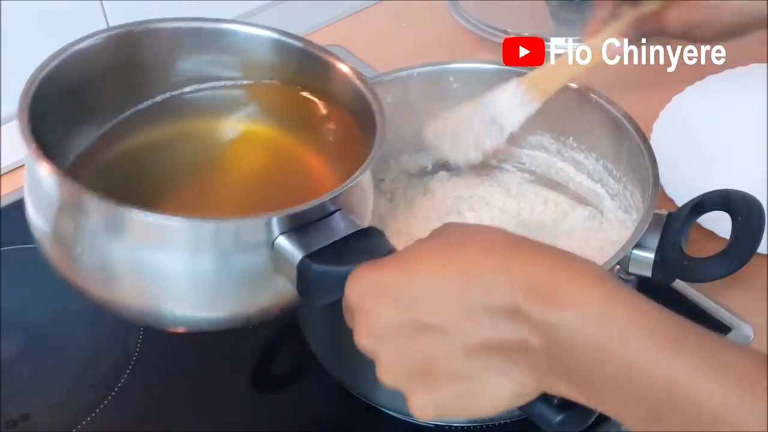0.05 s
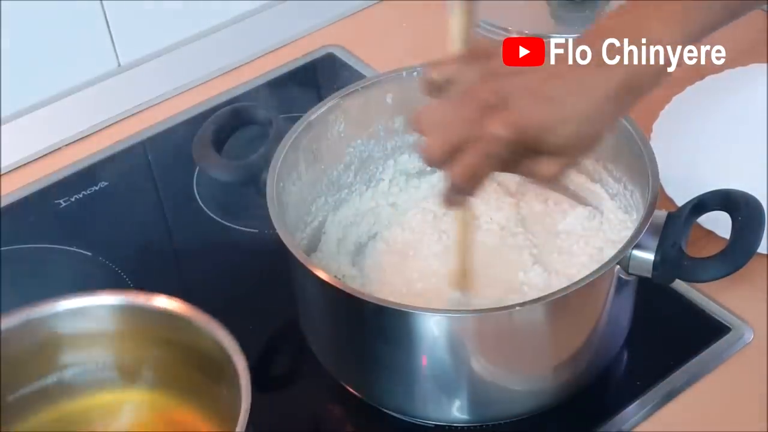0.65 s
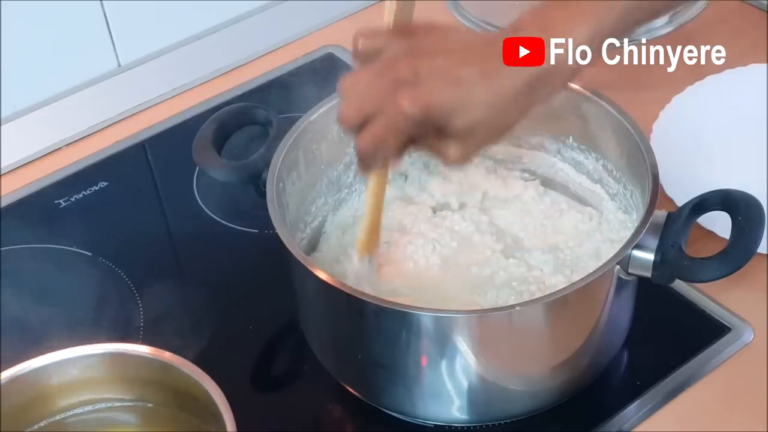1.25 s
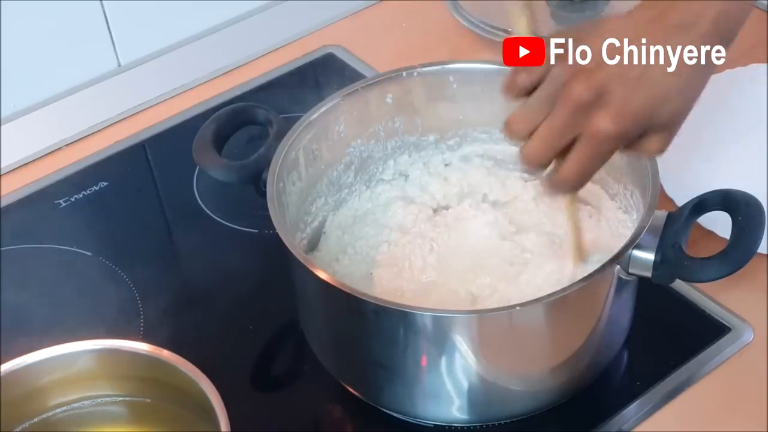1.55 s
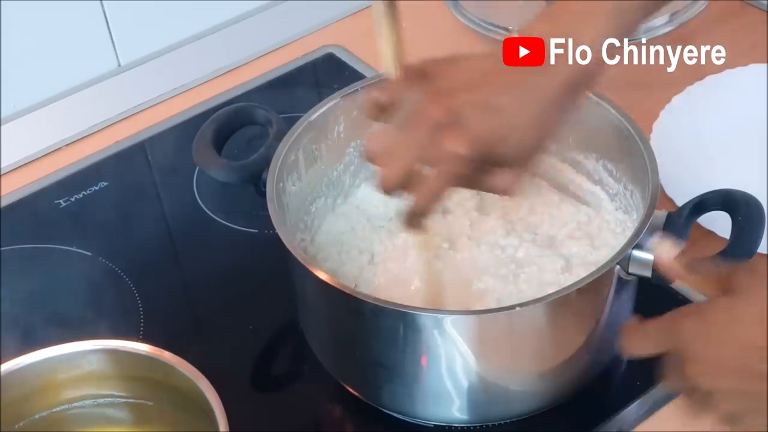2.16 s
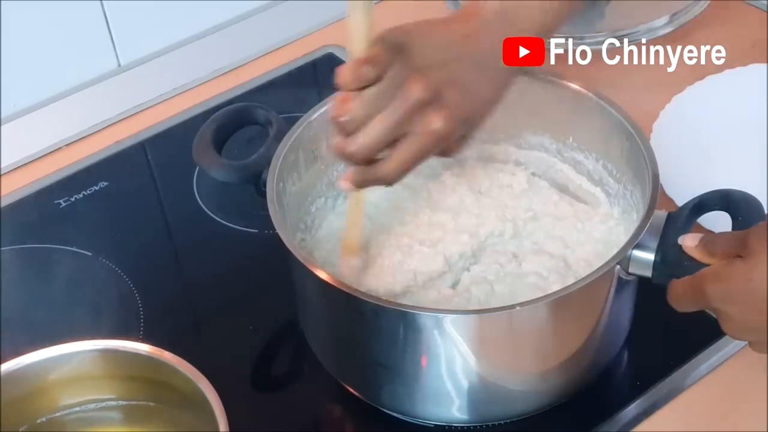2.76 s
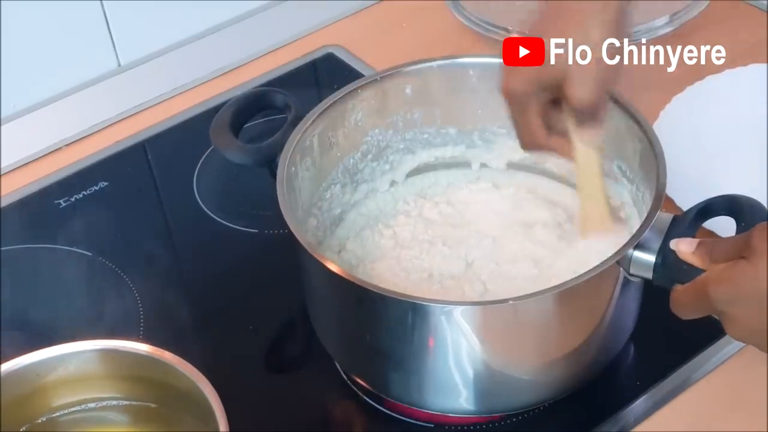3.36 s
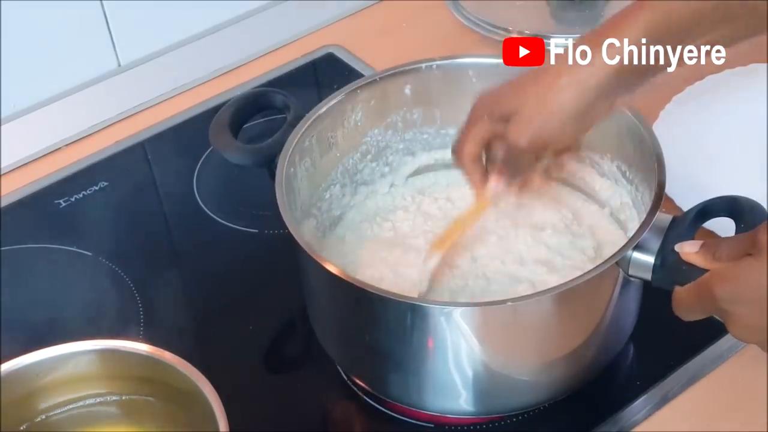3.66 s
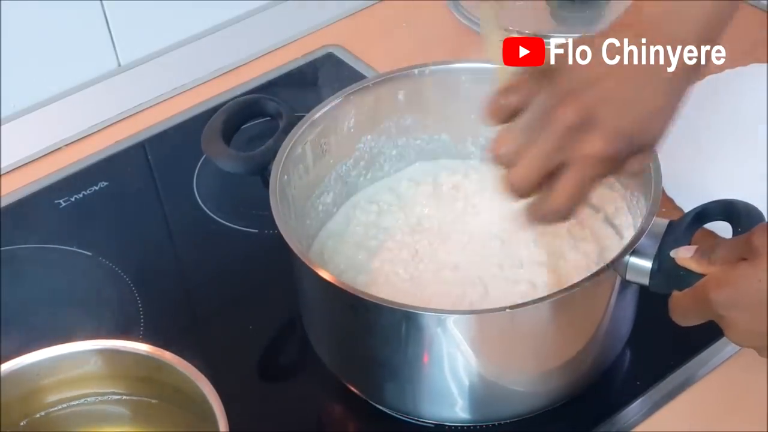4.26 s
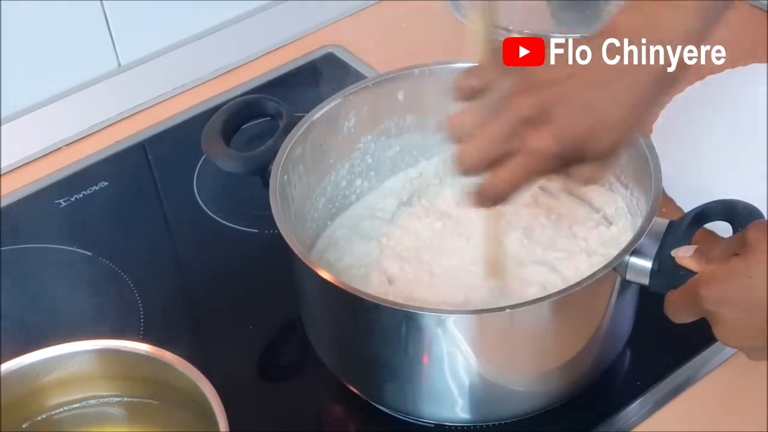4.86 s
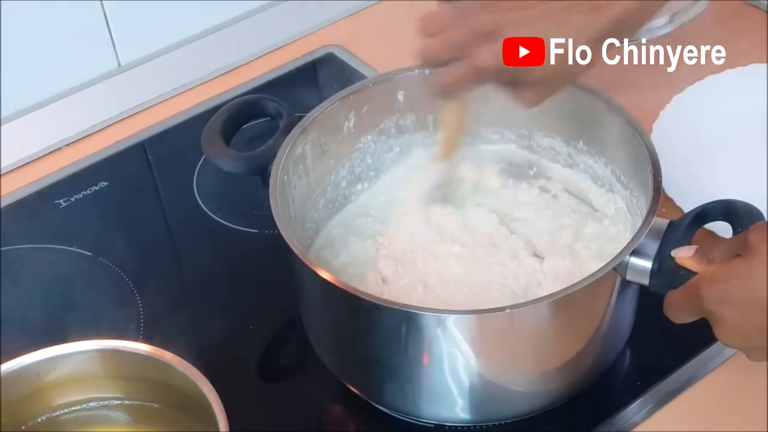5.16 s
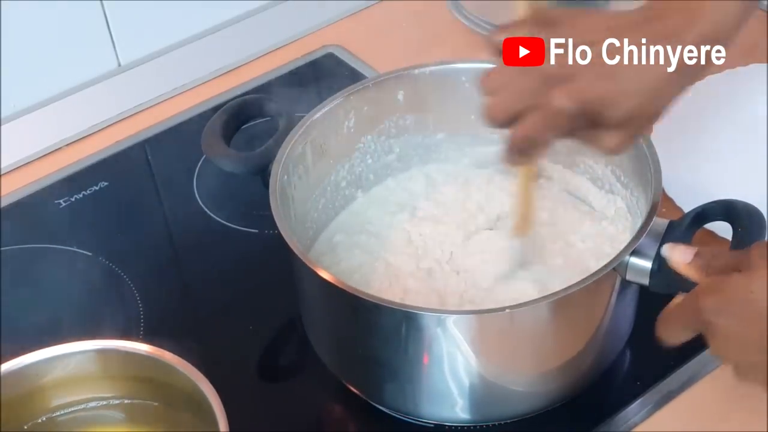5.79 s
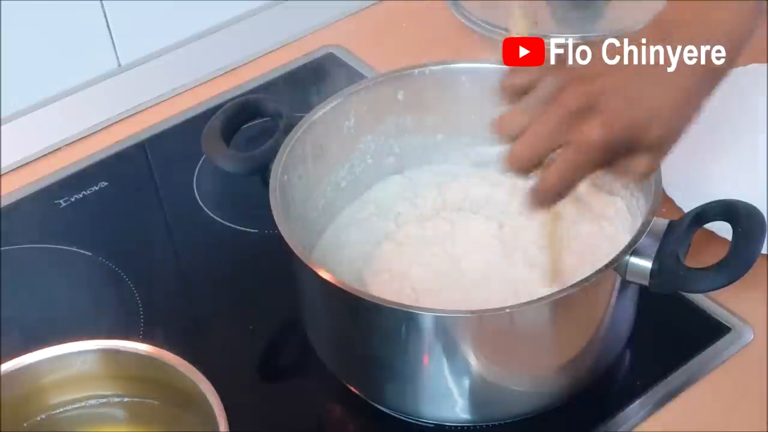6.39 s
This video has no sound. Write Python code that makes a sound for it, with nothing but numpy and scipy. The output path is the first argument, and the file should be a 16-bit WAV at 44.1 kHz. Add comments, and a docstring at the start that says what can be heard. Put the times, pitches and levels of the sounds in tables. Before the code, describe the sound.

A wooden spatula drags through thick paste in a steel pot, with soft squelches, hissing wipes along the wall and light knocks. Just over a second in, a saucepan is set down on the glass hob with one loud, briefly ringing clank. The stirring carries on in uneven strokes, with sharper ticks and short rasps near the end. The stereo microphone is just above the pot in a small tiled kitchen.

```python
"""Stirring paste in a steel pot

A small tiled kitchen, a stereo microphone pair just above a steel pot on a glass hob. A wooden spatula
drags through thick paste in little slips; the paste squelches behind it and hisses along the wall,
and wood bumps, rasps and ticks on steel. Early on, a saucepan is set down beside the pot
with one loud clank, and the room answers."""
import sys
import numpy as np
from scipy import signal
from scipy.fft import rfft, irfft
from scipy.io import wavfile

SR = 44100
rng = np.random.default_rng(int(sys.argv[2]) if len(sys.argv) > 2 else 0)


def generate_wav(sig):
    """Save sig (samples, or channels by samples) to the path in sys.argv[1] as 16-bit PCM at SR."""
    pcm = np.round(np.clip(np.atleast_2d(sig).T, -1, 1) * 32767).astype(np.int16)
    wavfile.write(sys.argv[1], SR, pcm)


N = 283563
HOP = 64  # samples per step of the coarse clock that the gestures run on


def amp(db):
    """Decibels to gain."""
    return 10 ** (np.asarray(db) / 20)


def unit(x):
    """Scales to rms 1."""
    return x / np.sqrt(np.mean(x ** 2) + 1e-20)


def read(points, hz):
    """A table read on a log-frequency axis."""
    f, value = np.transpose(points)
    return np.interp(np.log(hz + 1), np.log(f + 1), value)


def add(mix, s, sound):
    """Mixes a stereo sound in at s seconds."""
    part = mix[:, max(round(s * SR), 0):][:, :sound.shape[1]]
    part += sound[:, :part.shape[1]]


def colour(x, spectrum, size=4096):
    """Minimum-phase filter of unit energy, shaped like the given spectrum."""
    log_gain = np.log(amp(read(spectrum, abs(np.fft.fftfreq(size, 1 / SR)))))
    taps = np.fft.ifft(np.exp(np.conj(signal.hilbert(log_gain)))).real[:size // 2]
    return signal.oaconvolve(x, taps[None] / np.linalg.norm(taps), axes=1)[:, :x.shape[1]]


def resonate(x, hz, width_hz):
    """A resonance that follows the curve hz; rms 1."""
    turn = np.exp(2j * np.pi * np.cumsum(hz) / SR)
    pole = np.exp(-np.pi * width_hz / SR)
    return unit((turn * signal.lfilter([1 - pole], [1, -pole], x / turn)).real)


def near(x, lag):
    """A close source reaches the left microphone lag samples after the right."""
    return np.array([np.pad(x, (lag, 0))[:len(x)], x])


# Diffuse sound at the pair. Each row: frequency in Hz, correlation of left and right.
MIC_CORRELATION = [(60, 0.83), (250, 0.63), (500, 0.84), (1000, -0.27), (2000, -0.06), (15000, 0.078)]

def diffuse(pair):
    """Two unrelated signals become a field that is alike at both microphones in the bass."""
    a, b = rfft(pair)
    same = np.clip(read(MIC_CORRELATION, np.fft.rfftfreq(pair.shape[1], 1 / SR)), -1, 1)
    return irfft(np.array([a, same * a + np.sqrt(1 - same ** 2) * b]), pair.shape[1])


# The decay of the tiled room. Each row: frequency in Hz, t60 in seconds.
KITCHEN_T60 = [(100, 0.7), (400, 0.57), (1500, 0.54), (4000, 0.48), (8000, 0.36), (15000, 0.31)]

def tail(t60_scale, build_s):
    """Dense reflections that build up, then die band by band; energy 1 on the left."""
    hz, t, bands = signal.stft(diffuse(rng.standard_normal((2, SR))), SR, nperseg=256)
    t60 = t60_scale * read(KITCHEN_T60, hz)[:, None]
    out = signal.istft(bands * amp(-60 * t / t60), SR, nperseg=256)[1]
    out *= 1 - np.exp(-np.arange(out.shape[1]) / SR / build_s)
    return out / np.linalg.norm(out[0])


def kitchen(x, wet_db, places=3, circle_hz=1.3):
    """Direct sound plus reflections of pot wall, tiles and room, which change as the blade circles."""
    out = x.copy()
    for k in range(places):
        room = amp(wet_db) * tail(t60_scale=0.85, build_s=0.018)
        pot_wall = amp(wet_db + 2.5) * tail(t60_scale=0.097, build_s=0.00025)
        weight = np.cos(np.pi * (2 * circle_hz * np.arange(N) / SR + k / places)) * np.sqrt(2 / places)
        out += signal.oaconvolve(x * weight, (room + pot_wall)[:, :SR // 2], axes=1)[:, :N]
    return out


def wander(per_s):
    """Slow random motion between Gaussian knots."""
    knots = rng.standard_normal(4096)
    return np.interp(np.arange(N) / SR * per_s, np.arange(len(knots)), knots)


def slips(per_s, spread_db, smooth, clump_db, clump_per_s):
    """Tiny random slips of uneven size, in clumps, over a smooth rub; rms 1."""
    size = amp(spread_db * np.minimum(rng.exponential(1, N), 3.5)) * rng.choice([-1, 1], N)
    grains = unit(size * (rng.random(N) < per_s / SR))
    rub = smooth * rng.standard_normal(N)
    return unit((grains + rub) * amp(clump_db * wander(clump_per_s)))


def since(starts):
    """Seconds since each start, one row per gesture, on the coarse clock."""
    return np.maximum(np.arange(0, N, HOP) / SR - starts[:, None], 0)


def per_sample(control):
    """A control on the coarse clock, sample by sample."""
    return np.interp(np.arange(N), np.arange(0, N, HOP), control)


def gestures(starts, lengths, levels_db, attack_s, sag_db_per_s, t60_s):
    """The power of each gesture: it rises, sags while it is held, then dies away."""
    t = since(starts)
    released = np.maximum(t - lengths[:, None], 0)
    db = levels_db[:, None] - sag_db_per_s * t - 60 * released / t60_s
    return (np.minimum(t / attack_s, 1) * amp(db)) ** 2


def level(power, idle_db):
    """The gain of all gestures together, over the idle motion of a blade that never quite rests."""
    return per_sample(np.sqrt(power.sum(0) + amp(idle_db) ** 2))


def pitch(power, hz, idle_db, idle_hz):
    """A mean pitch weighted by power, so the strongest gesture leads."""
    idle = amp(idle_db) ** 2
    return per_sample(((power * hz).sum(0) + idle * idle_hz) / (power.sum(0) + idle))


# The kitchen's own quiet. Each row: frequency in Hz, relative level in dB.
ROOM_SPECTRUM = [(15, -36), (25, -11), (86, 6.5), (305, -28.5), (482, 2), (895, -17.5), (1140, -23),
                 (2230, -12), (2770, -6), (7500, -9.5), (15500, -42)]

def room_tone():
    """A faint steady hum and hiss from all around the microphones."""
    return amp(-59) * unit(colour(diffuse(rng.standard_normal((2, N))), ROOM_SPECTRUM))


# The hiss at the pot wall and the fizz above it. Each row: frequency in Hz, relative level in dB.
HISS_SPECTRUM = [(1200, -29), (2200, -11), (2900, -3.5), (3900, 0), (5000, -0.5), (6300, -3), (8000, -4.5),
                 (9500, -14), (16000, -19)]
FIZZ_SPECTRUM = [(4000, -32), (7500, -3), (9300, -5), (10500, -0.5), (13000, -1.5), (16000, -4)]
# Wipes along the wall. Each row: start and length in seconds, hiss in dB, fizz relative to it in dB.
WALL_WIPES = [(-.04, 0.13, -54, 0.5), (0.155, .04, -59, -4), (0.403, .19, -67, -2), (0.602, 0.059, -59, -3),
              (0.737, 0.11, -57, 0.5), (.89, 0.059, -66, -4), (1.112, 0.1, -61, -1), (1.3, 0.41, -60, -3.5),
              (1.921, .08, -59, -3.5), (2.175, 0.081, -57, -6), (2.247, 0.15, -57, -1),
              (2.43, 0.07, -56, -8), (2.557, .2, -61.5, -1), (2.76, 0.23, -59.5, -2),
              (2.978, 0.15, -58, -2.5), (3.14, 0.18, -65.5, 2.5), (3.342, .17, -54.5, -4),
              (3.545, 0.3, -60, -2.5), (3.715, 0.064, -57, 1), (3.822, 0.16, -65, 1.5), (3.98, .25, -65, 0),
              (4.21, 0.38, -62.5, -2), (4.69, 0.037, -70, -5), (4.83, .04, -70, 1), (4.974, 0.26, -61, -10),
              (5.204, 0.11, -59, 1), (5.347, 0.31, -64, -3), (5.6, 0.12, -59, -3), (5.73, .09, -64.5, -1.5),
              (6.026, 0.044, -54, 1), (6.244, 0.034, -60.5, -11), (6.317, 0.16, -76, 1)]

def wiping():
    """Under a nearly even pressure, wet paste tears off the wall in fine grains: hiss, fizz on top."""
    starts, lengths, hiss_db, fizz_db = np.transpose(WALL_WIPES)
    hiss_power = gestures(starts, lengths, hiss_db, attack_s=0.028, sag_db_per_s=1, t60_s=0.34)
    fizz_power = hiss_power * amp(fizz_db[:, None]) ** 2
    hiss = slips(per_s=1800, spread_db=5.5, smooth=0.64, clump_db=3, clump_per_s=95)
    fizz = slips(per_s=2000, spread_db=5, smooth=1, clump_db=1, clump_per_s=80)
    hiss = colour(near(hiss * level(hiss_power, idle_db=-76), 2), HISS_SPECTRUM)
    fizz = colour(near(fizz * level(fizz_power, idle_db=-71.5), 1), FIZZ_SPECTRUM)
    return kitchen(hiss + fizz, wet_db=0.5)


# The blade in the paste, close up. Each row: frequency in Hz, relative level in dB.
DRAG_SPECTRUM = [(100, -14.5), (190, -9.5), (250, -0.5), (340, -6), (500, -1), (620, -2), (760, -7),
                 (1050, -22.5), (1500, -24), (3000, -37)]

def drag(power, starts, loaded_hz, fresh_hz=481, loading_s=0.063, idle_db=-71.5):
    """The blade sticks and slips; paste piles up on it and, in most strokes, lowers the pitch."""
    loading = 1 - np.exp(-since(starts) / loading_s)
    stroke_hz = fresh_hz + (loaded_hz[:, None] - fresh_hz) * loading
    friction = slips(per_s=260, spread_db=1.8, smooth=0.4, clump_db=1.2, clump_per_s=60)
    voiced = resonate(friction, pitch(power, stroke_hz, idle_db, idle_hz=500), width_hz=260)
    return unit(colour(near(voiced, 1), DRAG_SPECTRUM)) * level(power, idle_db)


# The wet sound behind the blade. Each row: frequency in Hz, relative level in dB.
SQUELCH_SPECTRUM = [(500, -14.5), (850, 0.5), (1100, 2.5), (1450, -7.5), (1900, -2), (2300, -3.5),
                    (2750, 3), (3500, -3), (7000, -39.5)]

def squelch(power, starts, lengths, hollow_hz, octaves_per_s=0.28, idle_db=-74):
    """The hollow behind the blade colours the squelch like a vowel, rising in pitch as it closes."""
    closing_hz = hollow_hz[:, None] * 2 ** (octaves_per_s * (since(starts) - lengths[:, None] / 2))
    grains = slips(per_s=450, spread_db=4.5, smooth=0.65, clump_db=2, clump_per_s=70)
    voiced = resonate(grains, pitch(power, closing_hz, idle_db, idle_hz=1370), width_hz=840)
    return unit(colour(near(voiced, 2), SQUELCH_SPECTRUM)) * level(power, idle_db)


# The pot on the glass hob. Each row: frequency in Hz, relative level in dB.
RUMBLE_SPECTRUM = [(25, -20), (50, -15), (68, 2), (84, -5), (102, 0), (135, -2), (170, -10), (240, -5),
                   (320, -25.5), (600, -35)]
# The arm's weight on the pot. Each row: start in seconds, length in seconds, level in dB.
ARM_LEANS = [(0.282, 0.078, -58), (.52, 0.056, -59), (0.752, 0.04, -52), (0.861, .1, -59),
             (1.053, 0.048, -55), (1.422, 0.23, -48), (1.806, 0.1, -55), (2.285, 0.05, -45.5),
             (2.392, 0.14, -56), (2.793, 0.063, -56.5), (3.031, 0.16, -50.5), (3.408, 0.039, -45.5),
             (3.734, 0.22, -59.5), (3.9, 0.083, -62), (4.344, .05, -53), (4.825, 0.077, -57),
             (4.966, 0.07, -57), (5.31, 0.05, -53), (5.62, 0.083, -69), (5.854, 0.043, -57),
             (6.048, 0.032, -58), (6.323, .11, -52.5)]

def rumble(drag_power, drag_share_db=-12.5):
    """The pot rumbles on the hob when the arm leans on it, and a share of every drag shakes it too."""
    leans = gestures(*np.transpose(ARM_LEANS), attack_s=0.015, sag_db_per_s=24, t60_s=0.28)
    power = np.vstack([leans, drag_power * amp(drag_share_db) ** 2])
    shudder = slips(per_s=300, spread_db=1.5, smooth=0.7, clump_db=1, clump_per_s=36)
    return colour(near(shudder * level(power, idle_db=-68), 0), RUMBLE_SPECTRUM)


# Strokes through the paste, just below the microphones. Each row: start and length in seconds,
# drag and squelch levels in dB, pitch of the loaded blade in Hz, pitch of the hollow mid-stroke in Hz.
BLADE_STROKES = [(-.02, 0.18, -55, -61, 430, 1350), (.25, .07, -69, -67.5, 400, 1400),
                 (0.433, 0.084, -54.5, -64.5, 418, 1370), (0.533, 0.24, -61, -61, 330, 1720),
                 (0.643, 0.24, -63.5, -59.5, 353, 1470), (0.825, 0.1, -57.5, -56.5, 520, 1690),
                 (0.978, 0.037, -58.5, -61, 480, 1140), (1.077, 0.054, -55.5, -59, 248, 1220),
                 (1.172, 0.033, -80, -57, 404, 1760), (1.434, 0.19, -46.5, -52, 260, 1320),
                 (1.642, 0.057, -60.5, -54, 480, 1920), (1.786, 0.097, -48, -56.5, 450, 1100),
                 (1.92, 0.03, -69, -64.5, 400, 1310), (2.151, .03, -60, -65, 520, 1400),
                 (2.196, .08, -52, -55, 495, 1340), (2.273, 0.099, -50.5, -53, 463, 1450),
                 (2.421, 0.057, -57, -55.5, 400, 1550), (2.545, 0.094, -46.5, -51.5, 284, 1040),
                 (2.67, 0.14, -52, -59.5, 286, 1270), (2.86, 0.12, -61, -69, 447, 1350),
                 (2.996, .14, -57.5, -66.5, 290, 1140), (3.192, 0.15, -63, -66, 450, 1550),
                 (3.341, 0.15, -53, -56, 520, 1200), (3.422, .08, -49, -49.5, 416, 1310),
                 (3.54, .1, -57, -55.5, 480, 1320), (3.674, 0.17, -56.5, -57, 467, 1570),
                 (3.858, 0.25, -61, -62, 504, 1400), (4.161, 0.08, -53, -62, 515, 1150),
                 (4.239, 0.19, -50, -55, 410, 1430), (4.508, 0.077, -54, -56, 397, 1330),
                 (4.63, 0.092, -62, -66, 450, 1220), (4.831, 0.14, -54, -61.5, 420, 1100),
                 (4.97, 0.12, -54.5, -59.5, 320, 1200), (5.115, 0.085, -48.5, -55, 300, 1100),
                 (5.258, 0.094, -61, -66, 300, 1430), (5.37, 0.12, -50.5, -56, 280, 1020),
                 (5.493, 0.025, -56, -55, 300, 1190), (5.58, 0.038, -48, -53, 420, 1100),
                 (5.621, 0.07, -45.5, -54.5, 256, 1070), (5.775, 0.1, -48, -61, 220, 990),
                 (5.98, 0.057, -49.5, -59.5, 236, 1010), (6.018, 0.056, -45, -49.5, 233, 1320),
                 (6.237, 0.18, -51.5, -56, 473, 1190)]

def stirring():
    """Each stroke drags, squelches and shakes the pot; the drag eases quickly, the squelch lingers."""
    starts, lengths, drag_db, squelch_db, loaded_hz, hollow_hz = np.transpose(BLADE_STROKES)
    drag_power = gestures(starts, lengths, drag_db, attack_s=0.029, sag_db_per_s=24, t60_s=0.26)
    squelch_power = gestures(starts, lengths, squelch_db, attack_s=0.03, sag_db_per_s=13, t60_s=0.32)
    paste = drag(drag_power, starts, loaded_hz) + squelch(squelch_power, starts, lengths, hollow_hz)
    return kitchen(paste, wet_db=-3) + kitchen(rumble(drag_power), wet_db=-7.5)


# Cushioned knocks, close and nearly dry.
# Each row: start in seconds, level in dB, pitch in Hz, t60 in seconds.
BLADE_BUMPS = [(.044, -27.5, 546, 0.016), (.427, -32.5, 461, 0.071), (.430, -36, 108, 0.068),
               (0.444, -37, 264, 0.13), (1.916, -25, 510, 0.0044), (2.197, -35.5, 503, 0.049),
               (2.304, -37.5, 133, 0.092), (2.606, -32, 480, 0.022), (3.430, -23, 560, 0.011),
               (3.435, -35.5, 115, 0.069), (3.446, -29, 213, 0.032), (3.723, -31.5, 458, 0.027),
               (4.287, -44, 493, 0.014), (4.551, -24.5, 557, 0.0078), (4.690, -41, 444, 0.034),
               (5.048, -32, 493, 0.024), (5.207, -39.5, 258, 0.099), (5.502, -27.5, 495, 0.016),
               (5.592, -31.5, 482, 0.042), (5.652, -37, 310, 0.015), (5.828, -39.5, 246, 0.19),
               (5.873, -38, 114, 0.15), (5.912, -29, 475, 0.011), (6.005, -46, 312, 0.061),
               (6.037, -18, 484, 0.0087), (6.262, -32, 494, 0.038), (6.42, -31.5, 535, 0.021)]

def bumps(size=8192, attack_s=0.0009):
    """The blade meets the pot through the paste: a heavily damped ring."""
    out, t = np.zeros((2, N)), np.arange(size) / SR
    for s, db, hz, t60 in BLADE_BUMPS:
        ring = np.sin(2 * np.pi * hz * t) * amp(db - 60 * t / t60)
        add(out, s, near(ring * (1 - np.exp(-t / attack_s)), 1))
    return kitchen(out, wet_db=-11.5)


# Longer skids on the steel. Each row: start in seconds, level in dB, pitch in Hz, decay time in seconds.
WOOD_RASPS = [(0.078, -44.5, 4540, 0.039), (2.295, -53, 5940, 0.032), (5.639, -47, 2730, .02),
              (6.05, -38.5, 4000, 0.044), (6.088, -59, 4630, 0.04)]

def rasps(size=16384, slips_per_s=3000):
    """Wood chatters along the steel in a narrow band and dies away."""
    out, t = np.zeros((2, N)), np.arange(size) / SR
    for s, db, hz, decay_s in WOOD_RASPS:
        chatter = rng.standard_normal(size) * (rng.random(size) < slips_per_s / SR)
        band = [(hz / 4, -24), (hz / 1.5, -7), (hz / 1.15, 0),
                (hz * 1.15, 0), (hz * 1.45, -12), (hz * 3.5, -30)]
        rasp = unit(colour(near(chatter, 2), band))
        add(out, s, amp(db) * rasp * np.exp(-t / decay_s))
    return kitchen(out, wet_db=-3)


# Wood touching bare steel, close to the microphones.
# Each row: start in seconds, strength in dB, pitch in Hz, decay time of the skid in seconds.
WOOD_TICKS = [(.112, -19, 5780, 0.0032), (0.598, -30, 2850, 0.0026), (1.09, -34.5, 4500, 0.0023),
              (1.145, -31.5, 2800, 0.0025), (1.696, -30, 1760, 0.0026), (1.994, -19, 5430, 0.0024),
              (2.2918, -17, 6000, 0.00099), (3.439, -19.5, 4540, 0.0027), (3.757, -25, 3120, 0.0037),
              (3.9235, -22.5, 2870, 0.0016), (4.5466, -18.5, 2560, 0.0043), (4.551, -21, 1190, 0.0014),
              (4.827, -32.5, 7140, 0.0017), (5.048, -29.5, 1940, .002), (5.195, -12, 5900, 0.0049),
              (5.209, -16, 2900, 0.00045), (5.501, -45, 1500, .002), (5.658, -21, 2800, .0028),
              (6.051, -12, 4470, 0.0037)]

def ticks(size=4096):
    """Each touch is a sharp contact and a short skid, coloured by a broad resonance of the blade."""
    out, t = np.zeros((2, N)), np.arange(size) / SR
    for s, db, hz, skid_s in WOOD_TICKS:
        force = 0.077 * rng.standard_normal(size) * np.exp(-t / skid_s)
        force[0] += 1  # the contact ahead of the skid
        blade = [(hz / 6, -16), (hz / 1.5, -6), (hz, 0), (hz * 1.35, -7), (hz * 3, -25), (hz * 6, -38)]
        tick = colour(near(force, 2), blade)
        add(out, s, amp(db) * tick / np.linalg.norm(tick[1]))
    return kitchen(out, wet_db=-1)


# The clank as the room returns it. Each row: frequency in Hz, relative level in dB.
CLANK_SPECTRUM = [(30, -65), (60, 2), (110, -21), (190, -7.5), (260, 2), (400, -2), (620, -4), (800, -5.5),
                  (1500, -10), (2800, -5), (4100, -8.5), (7500, -15), (10000, -19.5), (16000, -41)]
# The ring of saucepan and hob. Each row: frequency in Hz, relative level in dB, t60 in seconds.
PAN_AND_HOB_MODES = [(104, -9, .6), (130, -14, .5), (246, 1, .34), (317, -10, .35), (379, -11, .35),
                     (464, -6, .45), (536, -9, .4), (866, -10, .42), (1322, -7, .3), (1702, -7, .3),
                     (1775, -10, .39), (1839, -8, .33), (1906, -12, .3), (2331, -13, .38), (2745, -10, .39),
                     (2815, -9, .35), (2861, -9, .35), (3350, -9, .42), (3909, -8, .45), (3983, -11, .35),
                     (4206, -13, .28), (5506, -15, .35), (5674, -17, .34), (6196, -18, .25),
                     (7180, -19, .4), (7817, -18, .22)]
# The saucepan lands beside the pot. Each row: start in seconds, gain in dB.
PAN_LANDING = [(1.2665, -6)]

def saucepan(ring_attack_s=0.00061):
    """One hard blow: a crack, the ringing modes of pan and hob, and the room's dense answer."""
    out, t = np.zeros((2, N)), np.arange(SR) / SR
    blow = near(signal.unit_impulse(SR), 1)
    crack = colour(blow, [(60, -8), (300, 0), (2000, 0), (3500, -7), (7000, -18), (15000, -34)])
    room = amp(15.5) * tail(t60_scale=1, build_s=0.00049)
    early = amp(7) * tail(t60_scale=0.12, build_s=0.00039)
    clatter = colour((room + early)[:, :SR], CLANK_SPECTRUM)
    ring = np.zeros((2, SR))
    for hz, db, t60 in PAN_AND_HOB_MODES:
        # high modes reach the two microphones further out of step
        angle = np.arccos(np.clip(read(MIC_CORRELATION, hz), -1, 1))
        apart = angle * np.array([[-0.4], [0.4]]) * rng.choice([-1, 1])
        ring += amp(db - 60 * t / t60) * np.sin(2 * np.pi * (hz * t + rng.random()) + apart)
    ring *= 1 - np.exp(-t / ring_attack_s)
    strike = amp(-18) * ring - amp(7) * crack
    for s, db in PAN_LANDING:
        add(out, s, amp(db) * (clatter + strike))
    return out


def scene():
    """Everything heard from just above the pot."""
    return room_tone() + wiping() + stirring() + bumps() + rasps() + ticks() + saucepan()


# The right microphone is a little duller. Each row: frequency in Hz, left minus right in dB.
MIC_BALANCE = [(100, 2), (400, 0.6), (1000, 1.5), (2000, 1), (4000, 2.5), (8000, 3), (14000, 0.5)]

def record(dry, cutoff_hz=15900):
    """The microphone pair leans slightly to the left, and the highest treble is cut off."""
    lean_db = read(MIC_BALANCE, np.fft.rfftfreq(N, 1 / SR)) * np.array([[0.5], [-0.5]])
    leaned = irfft(rfft(dry) * amp(lean_db), N)
    lowpass = signal.firwin(511, cutoff_hz, window=("kaiser", 9), fs=SR)
    return signal.oaconvolve(leaned, lowpass[None], "same")


dry = scene()
out = record(dry)
generate_wav(out)
```